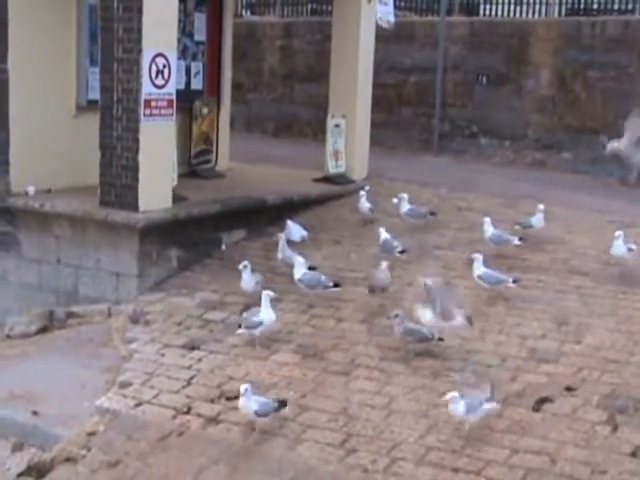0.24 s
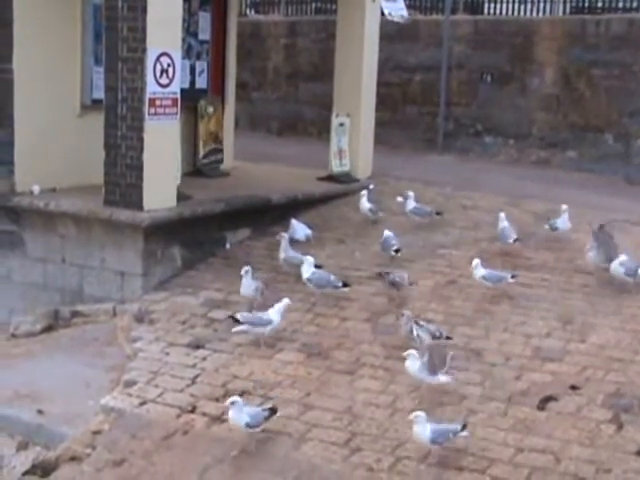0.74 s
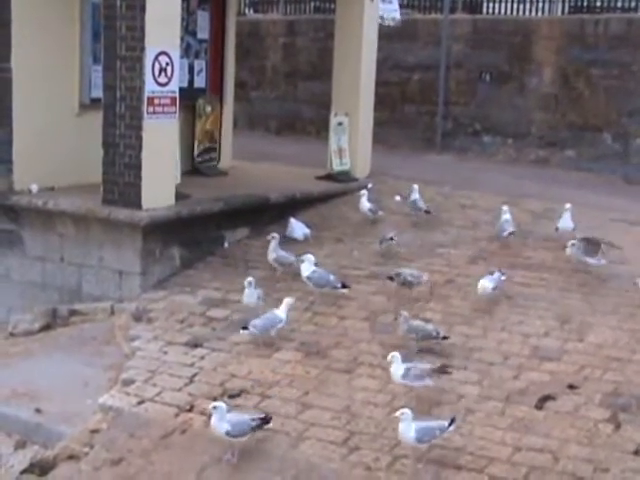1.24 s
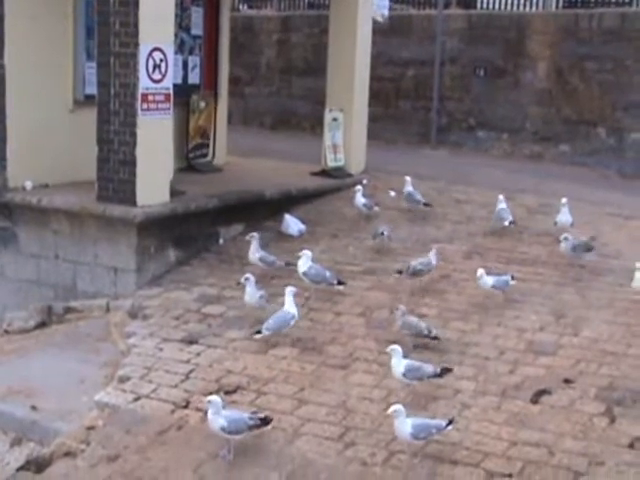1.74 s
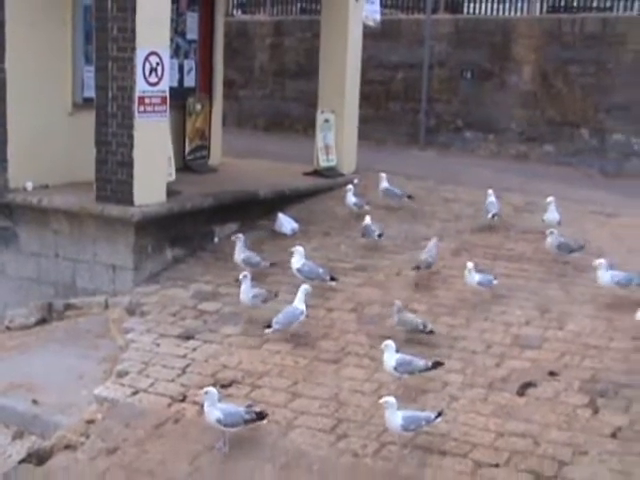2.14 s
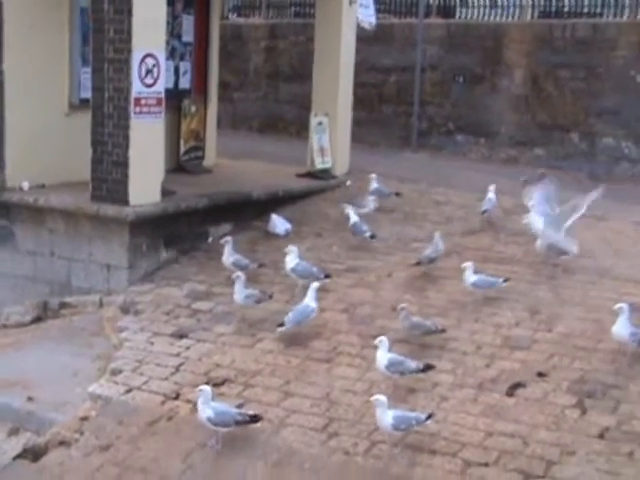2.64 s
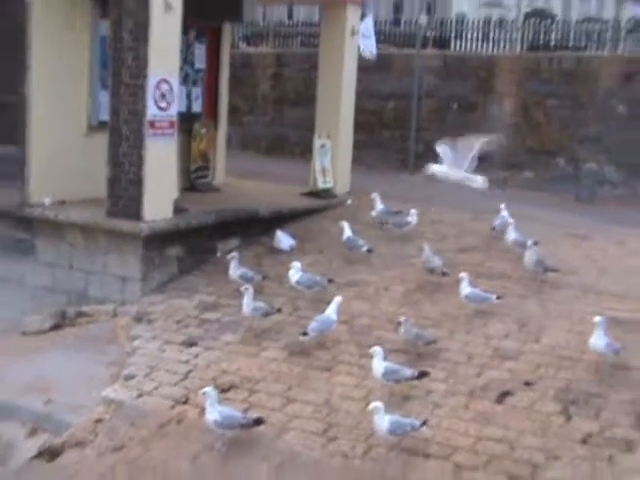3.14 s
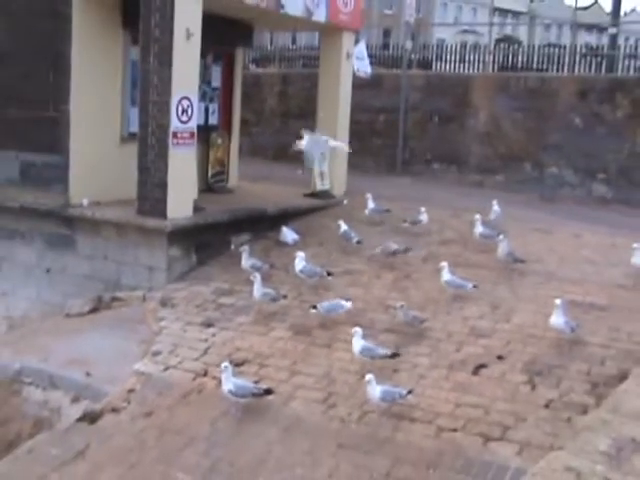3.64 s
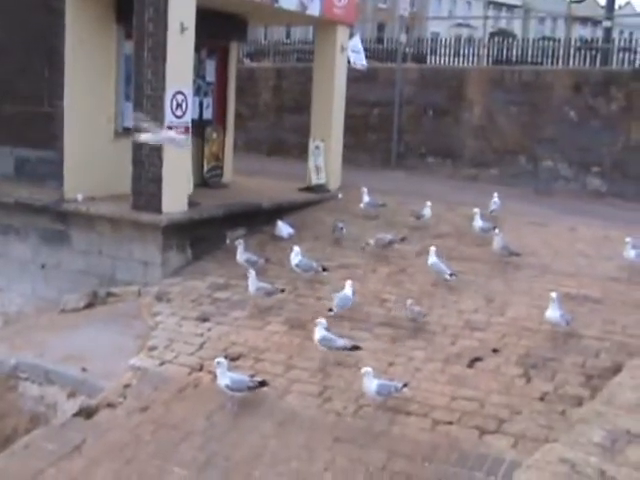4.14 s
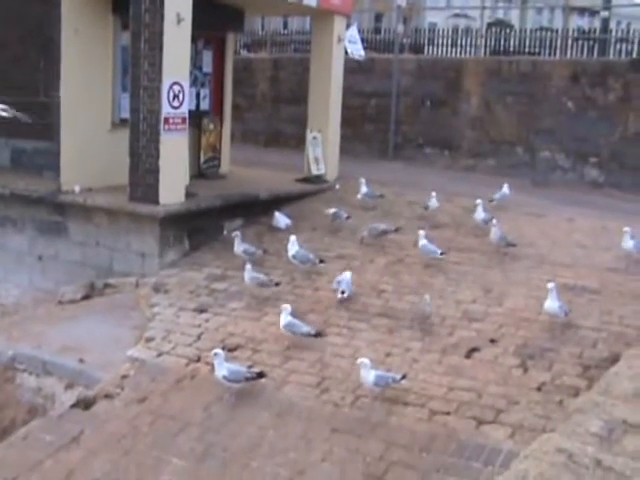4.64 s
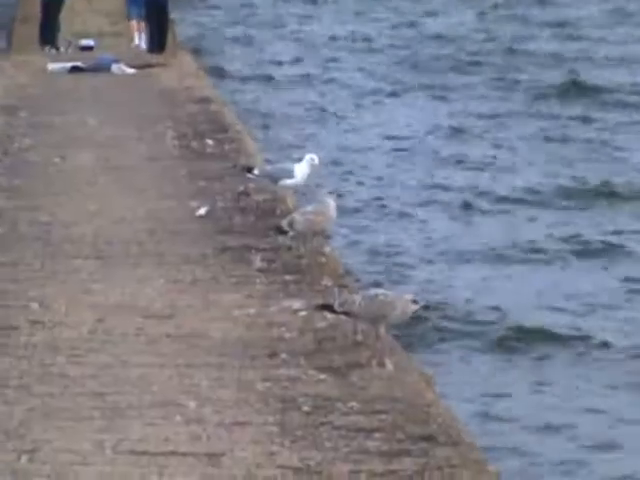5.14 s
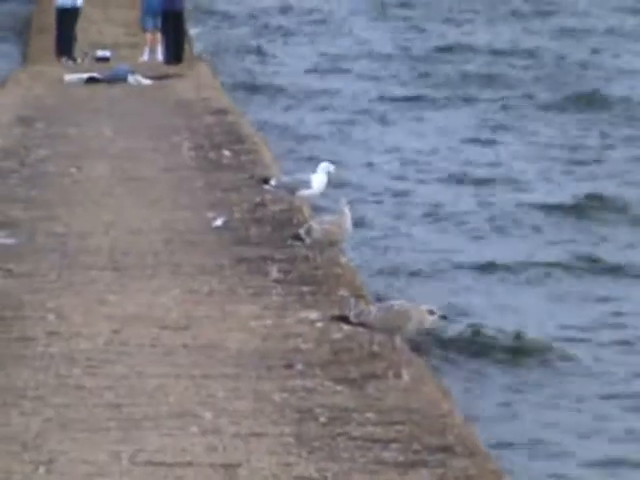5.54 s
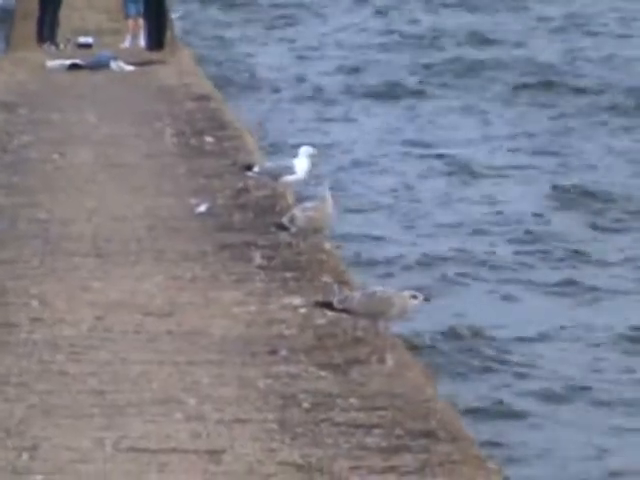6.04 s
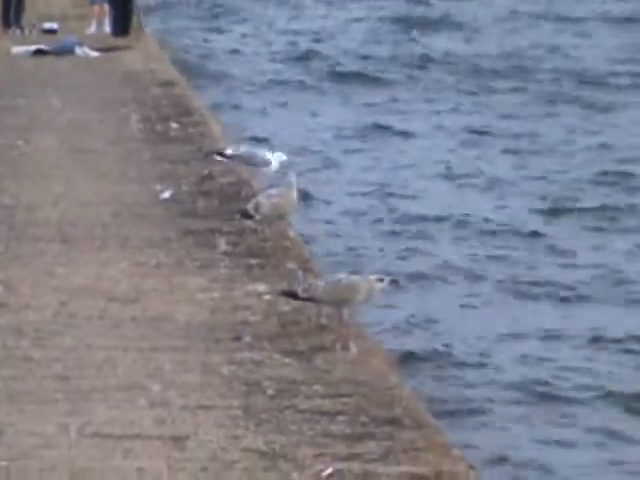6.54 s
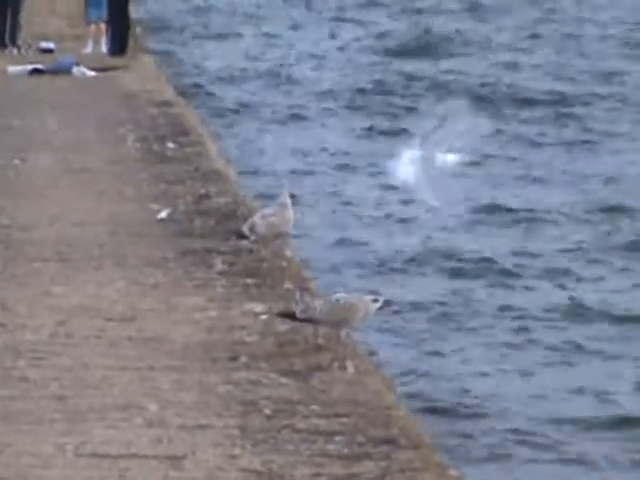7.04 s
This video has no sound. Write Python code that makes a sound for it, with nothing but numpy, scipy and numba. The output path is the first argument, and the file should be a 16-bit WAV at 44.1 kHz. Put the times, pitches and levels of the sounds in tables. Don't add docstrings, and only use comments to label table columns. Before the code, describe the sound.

A crowded gull flock cries and yelps over wind-buffeted surf, then a brief silent gap and an abrupt change to washing water and low wind thuds.

```python
import sys
import numpy as np
from scipy import signal
from scipy.fft import rfft, irfft, next_fast_len
from scipy.io import wavfile
from scipy.ndimage import uniform_filter1d
from numba import njit

SR = 44100
rng = np.random.default_rng(int(sys.argv[2]) if len(sys.argv) > 2 else 0)


def decibels_to_gain(level_db):
    exponent = np.asarray(level_db, float) / 20
    return 10 ** exponent


def master(y):
    cut = np.clip(np.atleast_2d(y).T, -1, 1)
    pcm = np.round(cut * 32767)
    wavfile.write(sys.argv[1], SR, pcm.astype(np.int16))


N = 322371

CHANGE_S, RESUME_S = 4.828, 4.892
FLOCK_SHAKE = 1.0
THUMP_S = 0.0074

# start in seconds, length in seconds, held pitch in Hz,
# closing pitch in Hz, level in dB.
KEOWS = [
    (3.17, .11, 1500, 1368, -24.5),
    (3.38, 0.21, 1496, 1316, -30),
    (3.72, 0.17, 1509, 1247, -30.5),
    (4.05, 0.12, 1527, 1410, -36),
    (4.73, .1, 1430, 1296, -31),
]
FALLS = [
    (1.7, 0.22, 1518, 1364, -31),
    (2.44, 0.13, 1464, 1297, -26),
    (2.75, 0.054, 1527, 1370, -31),
    (2.81, 0.1, 1527, 1295, -29),
    (2.85, .12, 1401, 1262, -29),
    (3.55, 0.049, 1487, 1283, -29),
]
MOANS = [
    (.57, 0.1, 1333, 1220, -28.5),
    (1.2, 0.063, 1154, 1063, -33),
    (1.66, 0.036, 1143, 1225, -28.5),
    (2.0, 0.04, 1150, 1265, -28.5),
    (1.83, 0.038, 1164, 1070, -25),
    (2.46, 0.093, 1344, 1283, -31.5),
    (4.04, 0.034, 1460, 1310, -42),
    (4.14, .12, 1440, 1298, -30.5),
    (4.26, 0.074, 1670, 1275, -32.5),
    (4.37, .23, 1510, 1217, -31),
]
PIPS = [
    (0, 0.072, 1410, 1510, -33),
    (1.07, 0.084, 1465, 1512, -23),
    (2.24, 0.031, 1506, 1590, -31.5),
    (3.0, 0.17, 1524, 1526, -27.5),
]
MEWS = [(0, 0.24, 1028, 990, -39), (.1, 0.12, 1080, 1150, -32.5), (4.05, 0.13, 1495, 1445, -33.5),
        (1.05, 0.043, 1200, 1080, -30), (.05, 0.13, 1480, 1510, -36), (.865, 0.064, 1204, 1145, -26),
        (.33, 0.087, 1475, 1500, -25.5), (.47, 0.041, 1220, 1285, -35), (.72, 0.036, 1210, 1270, -31),
        (1.1, 0.18, 1253, 1340, -33.5), (1.2, 0.031, 1565, 1670, -28), (1.75, 0.028, 1300, 1300, -28),
        (2.77, 0.049, 1464, 1575, -27), (3.16, 0.09, 1107, 1124, -33), (3.24, 0.36, 890, 932, -40),
        (4.58, 0.13, 1258, 1190, -42)]
HUMS = [
    (.95, .57, 1077, 1044, -35),
    (4.44, 0.33, 1046, 1059, -40),
    (4.73, 0.49, 1030, 1025, -39.5),
]
SQUEALS = [(.04, 0.05, 1375, 1330, -38), (.5, .06, 1200, 1150, -50), (1.07, 0.048, 1610, 1470, -49),
           (3.48, 0.079, 1214, 1167, -43), (.46, 0.17, 1425, 1320, -37.5), (2.2, 0.24, 1460, 1353, -43),
           (3.495, .18, 1660, 1580, -42.5), (3.55, 0.055, 1448, 1250, -39),
           (3.68, 0.088, 1450, 1290, -44.5), (3.95, 0.16, 1450, 1420, -42), (4.05, 0.032, 1460, 1250, -33),
           (4.33, .25, 1700, 1600, -45.5), (4.58, .15, 1402, 1315, -37.5), (4.74, 0.16, 1640, 1370, -52)]
YELPS = [
    (.31, 0.056, 1100, 1118, -29.5),
    (.55, 0.055, 1086, 1150, -28.5),
    (.76, 0.08, 1150, 1072, -25.5),
    (1.02, 0.082, 1197, 1048, -30.5),
    (1.265, 0.055, 1180, 1130, -29.5),
    (1.53, 0.054, 1150, 1140, -29),
    (1.79, 0.078, 1163, 1066, -26),
    (2.05, 0.069, 1175, 1117, -25.5),
]
SCREAMS = [
    (2.27, 0.11, 1300, 1126, -30),
    (2.555, 0.1, 1320, 1118, -33),
    (2.83, 0.12, 1354, 1070, -31.5),
]
CRACKS = [
    (4.255, 0.041, 1200, 1043, -28.5),
    (4.7, .04, 1162, 1036, -31),
]

# calls, (scoop up to pitch 0-1, scoop in seconds, lateness of the slide, mid-call swell in dB,
# suddenness of the tone change), partials one to three in dB at the start, the same at the end,
# partials above in dB, place right of the flock in dB.
KINDS = [
    (KEOWS, (0.0311, 0.0296, 3.8, 4.2, 1.6), (-6.5, -11.5, -24), (-0.43, -6, -14.5), -35, 0),
    (FALLS, (0.0036, 0.05, 1.1, 6.4, 1.9), (-1.1, -0.5, -20.5), (-2.2, -9, -17), -20.5, 0),
    (MOANS, (0.013, 0.026, 1.5, 4.6, 1.5), (-5, -15, -21), (-0.92, -11, -13.5), -23, 0),
    (PIPS, (0.008, 0.014, 2.6, 8.5, 5.5), (-3, -3.5, -27), (-10, -9.5, -56), -24.5, 0),
    (MEWS, (0.0061, 0.037, 1.4, 1.8, 1.2), (-17, -1.8, -26), (-35, -1.8, -19), -17.5, 0),
    (HUMS, (0.0046, 0.04, 0.71, 2.5, 1.8), (-7, -1.5, -6), (-4.5, -10.5, -19), -29, 0),
    (SQUEALS, (0.02, 0.024, 1.2, 4.5, 1.2), (-17.5, -21, -1.1), (-10, -20, -1.5), -9.5, 0),
    (YELPS, (0.004, 0.02, 1.15, 1.3, 2.2), (-27, -13.5, 0.79), (-25, 0.5, -10), -10.5, 5.9),
    (SCREAMS, (0.026, 0.025, 1.7, 2.3, 1.7), (-21, -6, -25), (-17, 0, -16), -6, 7.2),
    (CRACKS, (0.0039, 0.01, 0.92, 3.4, 1.5), (-19.5, -2, -17), (-26, 0, -23), -8.5, 4),
]


@njit
def follow(x, attack, release):
    y, e = np.empty(len(x)), x[0]
    for i in range(len(x)):
        e += (x[i] - e) * (attack if x[i] > e else release)
        y[i] = e
    return y


def curve(rows):
    return decibels_to_gain(np.interp(np.arange(N) / SR, *np.transpose(rows)))


def unit(x):
    return x / np.sqrt(np.mean(x ** 2))


def walk(rate, size=N):
    k = int(SR / rate)
    steps = np.repeat(rng.standard_normal(size // k + 1), k)
    return uniform_filter1d(uniform_filter1d(steps, k), k)[:size]


def colour(x, points, low_hz=0, high_hz=SR):
    size = next_fast_len(len(x))
    hz = np.fft.rfftfreq(size, 1 / SR) + 1
    point_hz, point_db = np.transpose(points)
    db = np.interp(np.log(hz), np.log(point_hz), point_db)
    inside = (hz >= low_hz) * (hz < high_hz)
    return irfft(rfft(x, size) * decibels_to_gain(db) * inside, size)[:len(x)]


def call(start, length, held_hz, closing_hz, db, shape, first_db, last_db):
    scoop, scoop_s, late, swell_db, sudden = shape
    u = np.linspace(0, 1, num=17)
    hz = held_hz * (1 - scoop * np.exp(-u * length / scoop_s)) + (closing_hz - held_hz) * u ** late
    turn = np.clip(0.5 + sudden * (u - 0.5), 0, 1)
    tone_db = np.outer(first_db, 1 - turn) + np.outer(last_db, turn)
    partials_db = db + swell_db * np.sin(np.pi * u) + tone_db
    return np.column_stack([start + u * length, hz, *partials_db])


def billed(rows, share, third_db):
    s, hz, db, bill_db = np.transpose(rows)
    return np.column_stack([s, hz, db, db + bill_db, db + third_db + share * bill_db])


def cry(rows, upper_db, shake):
    # frequency in Hz, level in dB.
    throat = [(5200, -4.5), (5600, -14.5), (7300, -12), (9300, -21), (12500, -35)]
    # frequency in Hz, level in dB per Hz.
    hoarse = [(500, -34), (1200, 3), (3000, -5), (5000, -2), (10000, -23)]
    hoarse_db, break_hz_per_s = -18, 4600
    s, hz, *partial_db = np.transpose(rows)
    t = np.arange(s[0] - 0.004, s[-1] + 0.0071, 1 / SR)
    size = len(t)

    def smooth(values):
        return uniform_filter1d(np.interp(t, s, values), 400)

    held = smooth(hz)
    slide = np.abs(np.gradient(held)) * SR
    rasp = np.clip(0.27 * shake + slide / 6000, 0, 0.9)
    waver = shake * 0.00607 * walk(59.55, size)
    roughness = 0.013 * rasp * walk(246.4, size)
    pitch = held * (1 + waver + roughness)
    phase = 2 * np.pi * np.cumsum(pitch) / SR

    effort = np.max([smooth(d) for d in partial_db], axis=0)
    swell = upper_db + effort - effort.max() + 5
    breaks = 1.4 * walk(88.7, size) + 2 * walk(25, size)
    voice = 0
    for k in range(1, 10):
        if k < 4:
            db = smooth(partial_db[k - 1])
        else:
            db = swell + np.interp(k * pitch, *np.transpose(throat)) - 6.3 * (k % 2)
        flutter = decibels_to_gain(shake * (breaks + (1.8 + 0.79 * k) * walk(81.5, size)))
        haze = 1 + rasp * (1.04 * walk(500, size) + 0.26 * walk(4000, size))
        partial = np.sin(k * phase + k * k) * (k * pitch < SR / 3)
        voice = voice + decibels_to_gain(db) * flutter * haze * partial

    broken = np.clip(uniform_filter1d(slide, 400) / break_hz_per_s, 0, 1) ** 2
    air = unit(colour(rng.standard_normal(size), hoarse))
    voice = voice + decibels_to_gain(effort + hoarse_db) * broken * air
    edge = np.clip(np.minimum(t - t[0], t[-1] - t) / 0.015, 0, 1)
    return int(max(t[0], 0) * SR), np.sqrt(2) * voice * edge


def far_flock():
    calls_per_s, mean_db, scatter_db, low_hz, high_hz = 9, -46, 3, 1100, 1650
    chances = rng.random((int(calls_per_s * CHANGE_S), 6))
    calls = []
    for when, pitch, length, fall, loud, kind in chances:
        start, length_s = when * (CHANGE_S - 0.2), 0.05 + 0.12 * length
        hz = low_hz + (high_hz - low_hz) * pitch
        db = mean_db + scatter_db * (2 * loud - 1)
        _, shape, first_db, last_db, upper_db, _ = KINDS[int(kind * len(KINDS))]
        rows = call(start, length_s, hz, hz * (1 - 0.16 * fall), db, shape, first_db, last_db)
        calls.append((rows, db + upper_db, 0, FLOCK_SHAKE))
    return calls


def gulls():
    # time in seconds, pitch in Hz,
    # fundamental in dB, bill opening as second over first partial in dB.
    lead = [
        [(.15, 1492, -27, 5), (.165, 1537, -25.5, 5), (.188, 1524, -29.5, 13.5), (.224, 1507, -26.5, 0),
         (.238, 1504, -30, 12), (.258, 1477, -25, 6.5), (.3, 1400, -24, 2), (.325, 1350, -25, -1),
         (.345, 1240, -22.5, -14)],
        [(.66, 1400, -29, 2), (.7, 1480, -27, 0.5), (.74, 1517, -34.5, 4.5), (.77, 1508, -31.5, 15.5),
         (.83, 1500, -24.5, 11.5), (.858, 1475, -30, 6), (.91, 1446, -24.5, 12.5), (.955, 1419, -21, 1.5),
         (.99, 1280, -16, -9)],
        [(1.26, 1429, -19, 7), (1.28, 1490, -28.5, -1), (1.33, 1502, -17.5, -3.5), (1.4, 1484, -22, 2.5),
         (1.46, 1448, -27, 12.5), (1.51, 1486, -23.5, 6.5), (1.535, 1426, -31, -3), (1.57, 1426, -18.5, 3),
         (1.62, 1226, -23, -18)],
        [(1.91, 1490, -22, 6), (1.926, 1497, -29, 12), (2.01, 1498, -22.5, 13), (2.04, 1500, -25, 2.5),
         (2.072, 1480, -32.5, 11.5), (2.09, 1485, -12, -3), (2.13, 1490, -13.5, -3.5), (2.17, 1440, -22, -4),
         (2.205, 1287, -25, -6)],
    ]
    wanderers = [
        [(.2, 990, -62, 20), (.3, 990, -58, 26), (.4, 995, -53, 24), (.42, 966, -57, 21)],
        [(.26, 1125, -62, 24), (.33, 1133, -58.5, 28), (.42, 1130, -55.5, 27), (.435, 1080, -53, 24)],
        [(2.37, 1480, -35, -4), (2.45, 1531, -25.5, 1), (2.55, 1507, -29.5, -3), (2.65, 1585, -24, -7.5),
         (2.75, 1716, -31, -9.5), (2.9, 1710, -24, -14.5), (2.95, 1530, -25.5, -9), (2.98, 1290, -43, 2)],
        [(2.45, 1068, -71, 36), (2.52, 1008, -60.5, 27), (2.72, 1022, -50.5, 14.6), (3.0, 1040, -60.5, 31),
         (3.35, 1025, -46, 6.8), (3.5, 949, -55, 26.5), (3.55, 894, -56, 42), (3.6, 780, -70, 8.6)],
        [(3.8, 1443, -29, 0), (3.85, 1597, -23, -5), (3.92, 1674, -35, -11), (3.98, 1820, -35.5, -14),
         (4.03, 1798, -25.5, -19), (4.05, 1750, -20.5, -24), (4.07, 1485, -25, -24), (4.09, 1310, -30, -20)],
    ]
    wails = [
        [(3.85, 1200, -53, 14), (3.93, 1250, -57, 24), (4.1, 1272, -52, 11.4), (4.24, 1212, -50, 17),
         (4.27, 1112, -56, 19.3), (4.3, 1060, -58.5, 10.4)],
        [(3.95, 1697, -53, 18), (4.08, 1737, -47, 19), (4.18, 1660, -53, 30), (4.26, 1616, -40.5, 13.6),
         (4.275, 1630, -27, 6)],
        [(4.49, 1550, -26, 3), (4.52, 1630, -34, 7.7), (4.54, 1716, -52.5, 24), (4.58, 1695, -46, 24),
         (4.6, 1680, -67.5, 22), (4.69, 1630, -62.5, 23), (4.715, 1550, -52.5, 25), (4.73, 1500, -61, 22)],
    ]
    # time in seconds, left minus right in dB.
    flock_pan = [
        (0, -4),
        (2.5, 3.5),
        (4.8, 2),
    ]
    # notes, bill share in the third partial, third over fundamental dB, upper partials dB, shake
    groups = [(lead, 0.62, -12, -35, 0.6), (wanderers, 0.93, -17, -60, 0.6), (wails, 0.3, -19, -44, 1.5)]

    cries = far_flock()
    for notes, share, third_db, upper_db, shake in groups:
        for rows in notes:
            cries.append((billed(rows, share, third_db), upper_db, 0, shake))
    for calls, shape, first_db, last_db, upper_db, right_db in KINDS:
        for row in calls:
            cries.append((call(*row, shape, first_db, last_db), row[-1] + upper_db, right_db, FLOCK_SHAKE))

    out = np.zeros((2, N))
    for rows, upper_db, right_db, shake in cries:
        start, voice = cry(rows, upper_db, shake)
        pan_db = np.interp(rows[0][0], *np.transpose(flock_pan)) - right_db
        out[:, start:start + len(voice)] += voice * decibels_to_gain(np.array([[pan_db], [-pan_db]]) / 2)

    t = np.arange(SR // 2) / SR
    echoes = rng.standard_normal((2, len(t))) * decibels_to_gain(-60 * t / 0.24) * (t > 0.006)
    echoes /= np.sqrt(np.sum(echoes ** 2, axis=1, keepdims=True))
    middle = out.mean(axis=0, keepdims=True)
    return out + decibels_to_gain(-10) * signal.fftconvolve(middle, echoes, axes=1)[:, :N]


def hiss(points, swell_db, flicker_db, side_db):
    out, swell = 0, walk(5.1)
    for hz in 70 * 2 ** np.arange(0, 8, 0.5):
        mid, side = (colour(rng.standard_normal(N), points, hz, hz * np.sqrt(2)) for _ in range(2))
        level = decibels_to_gain(swell_db * swell + flicker_db * walk(15))
        out = out + level * (mid + decibels_to_gain(side_db) * side * np.array([[1], [-1]]))
    return unit(out)


def thumps(fade_s):
    # start in seconds, peak in dB.
    hits = [(0.127, -5.5), (0.356, -13), (0.603, -6), (0.659, -11), (0.727, -10.5), (0.85, -6.5),
            (0.979, -5), (1.035, -4.5), (1.11, -5), (1.232, -7), (1.349, -5.5), (1.408, -8), (1.604, -1.5),
            (1.639, -6), (2.014, -8.5), (2.068, -3.5), (2.155, -11.5), (2.377, -16.5), (2.897, -8.5),
            (2.999, -11.5), (3.132, -13), (3.264, -9), (3.587, -13), (3.775, -15), (4.094, -2.5),
            (4.136, -17.5), (4.395, -10), (4.559, -8.5), (4.617, -13), (4.657, -10.5)]
    s, db = np.transpose(hits)
    since = np.maximum(np.arange(N) / SR - s[:, None], 0) / fade_s
    strength = (db[:, None] + 14) / 8
    return np.sum(strength * since * np.exp(1 - since), axis=0)


def wind():
    # frequency in Hz, level in dB per Hz.
    buffet = [(12, -51), (20, -13.5), (98, -4), (171, -2.5), (334, -9), (546, -18), (1000, -37),
              (2200, -120)]
    # time in seconds, level in dB.
    knock_gusts = [(0.0, -30), (0.28, -24.5), (0.29, -32), (1.79, -28), (2.02, -33), (2.18, -23.5),
                   (2.3, -29.5), (2.74, -24), (2.79, -36), (3.15, -24), (3.21, -40.5), (3.29, -26.5),
                   (4.26, -31), (4.36, -35), (4.4, -23), (4.8, -31.5)]
    # time in seconds, level in dB.
    pier_gusts = [(4.89, -31), (5.24, -28), (5.3, -16), (5.6, -24), (6.1, -28.5), (6.25, -24),
                  (6.42, -28.5), (6.48, -24.5), (6.74, -22.5), (6.8, -33), (6.9, -18), (7.0, -25.5),
                  (7.08, -23.5), (7.31, -31)]
    # frequency in Hz, level in dB.
    slow_flow = [(45, 5.5), (90, -1), (140, -8.5), (300, -9.5)]
    split_hz = 130.0
    gust_db = 7.5 * thumps(THUMP_S) + 3.6 * walk(110) + 0.41 * walk(25)

    def knocks():
        return decibels_to_gain(gust_db + 4.4 * walk(110)) * rng.standard_normal(N)

    shared, left, right = (colour(unit(knocks()), buffet, split_hz) for _ in range(3))
    small = np.array([np.roll(shared, int(0.001 * SR)) + 0.85 * left, shared + 1.07 * right])
    both, left, right = (colour(rng.standard_normal(N), buffet, 0, split_hz) for _ in range(3))
    big = decibels_to_gain(1.1 * walk(6)) * np.array([both + 0.68 * left, both + 0.66 * right])

    balance = decibels_to_gain(np.array([[0.9], [-0.9]]))
    slipway = decibels_to_gain(-13) * unit(big + decibels_to_gain(26.5) * curve(knock_gusts) * small) * balance
    fading = decibels_to_gain(-0.5 * np.arange(N) / SR)
    slowed = np.array([colour(port, slow_flow) for port in big + decibels_to_gain(-2) * small])
    pier = unit(slowed) * curve(pier_gusts) * decibels_to_gain(1.0)
    return np.where(np.arange(N) > CHANGE_S * SR, pier, slipway * fading)


def scene():
    # time in seconds, level in dB.
    surf_level = [
        (0, -29.5),
        (2.0, -28.5),
        (2.2, -32),
        (3.0, -32),
        (3.4, -35),
        (4.0, -34),
        (4.4, -37),
        (4.8, -34),
    ]
    # time in seconds, level in dB.
    wash_level = [
        (4.89, -24),
        (5.9, -24.5),
        (7.31, -27.5),
    ]
    # frequency in Hz, level in dB per Hz.
    harbour = [(290, -8), (500, -13.5), (1470, -3.5), (1950, -14), (2980, -12.5), (9900, -31.5),
               (13000, -52)]
    water = [(59, -49), (100, -18), (195, 0.5), (603, -1.5), (2630, -10.5), (8770, -20.5), (11700, -29.5),
             (13200, -55.5)]
    t = np.arange(N) / SR
    slipway = gulls() + curve(surf_level) * hiss(harbour, 1.5, 3, -10)
    pier = hiss(water, 0.067, 0.37, -9.5) * curve(wash_level) * decibels_to_gain(np.array([[1.0], [2.5]]))
    fizz = pier - uniform_filter1d(pier, size=9, axis=1)
    pier = pier + fizz * (decibels_to_gain(2 * np.minimum(5.9 - t, 1.1)) - 1)
    gap = np.clip(np.maximum(CHANGE_S - t, t - RESUME_S) * 2000, 0, 1)
    return (np.where(t < CHANGE_S, slipway, pier) + wind()) * gap


def low_pass(x):
    return signal.sosfilt(signal.butter(12, 13200, fs=SR, output="sos"), x)


def record(dry):
    deep_gusts = [
        5.29,
        5.889,
        6.741,
        6.931,
    ]
    level = follow(np.abs(dry).max(axis=0), 0.038, 0.00052)
    since = np.arange(N) / SR - np.array(deep_gusts)[:, None]
    ducks_db = -5 * np.sum(np.exp(-np.abs(since) / 0.02) * (since > 0), axis=0)
    thump_duck_db = -0.5 * thumps(2.04 * THUMP_S)
    squeeze = np.minimum(1, decibels_to_gain(-12) / (level + 1e-9)) ** 0.5
    loud = dry * decibels_to_gain(2.5 + ducks_db + thump_duck_db) * squeeze
    return low_pass(np.clip(loud, -0.95, 0.95))


dry = scene()
out = record(dry)
master(out)
```